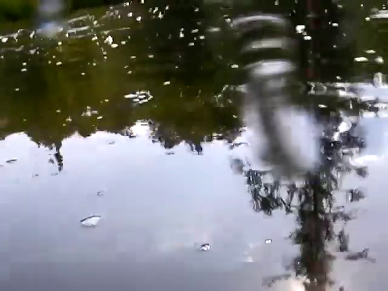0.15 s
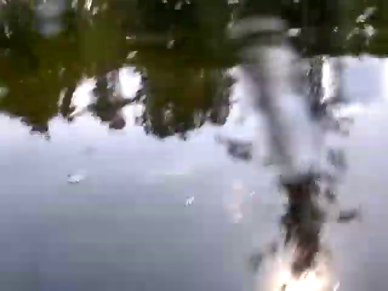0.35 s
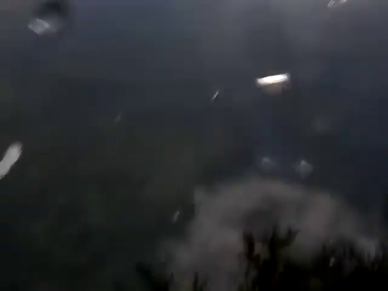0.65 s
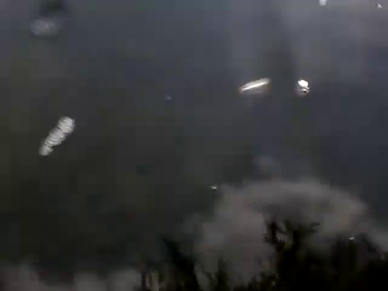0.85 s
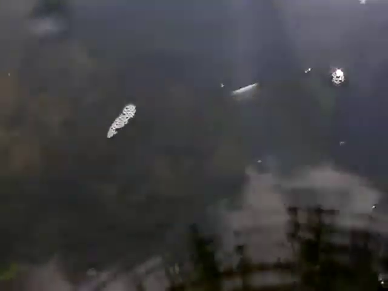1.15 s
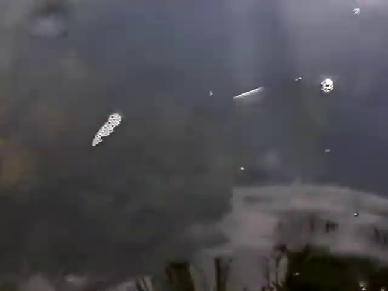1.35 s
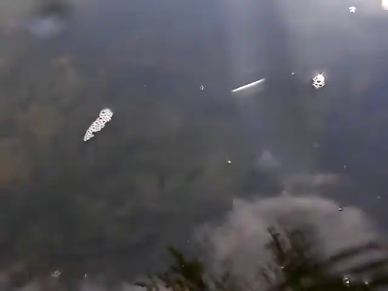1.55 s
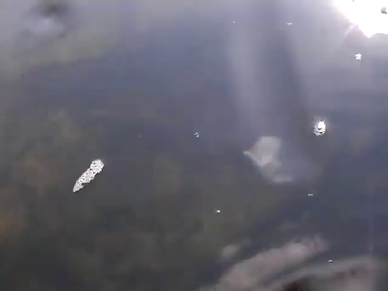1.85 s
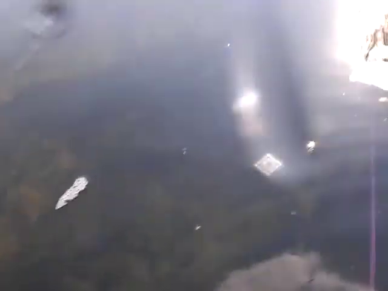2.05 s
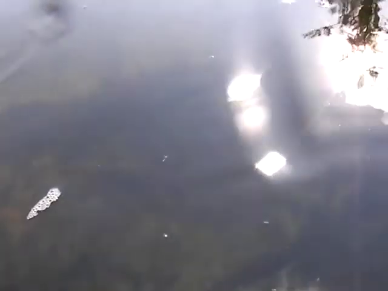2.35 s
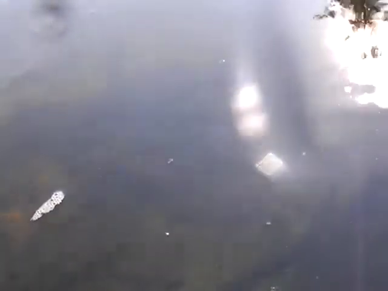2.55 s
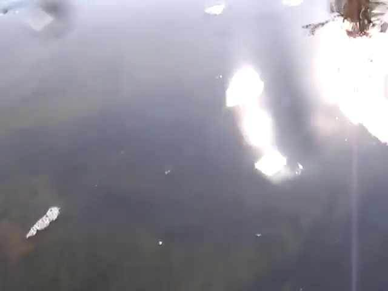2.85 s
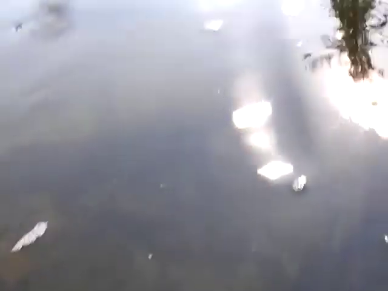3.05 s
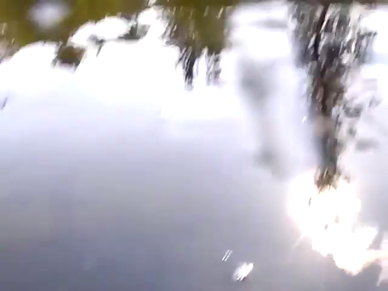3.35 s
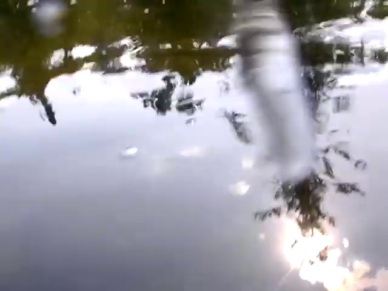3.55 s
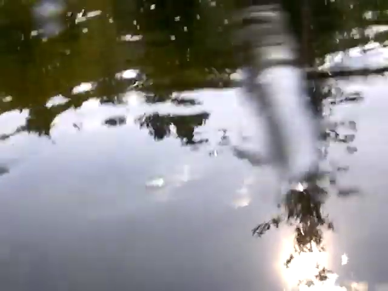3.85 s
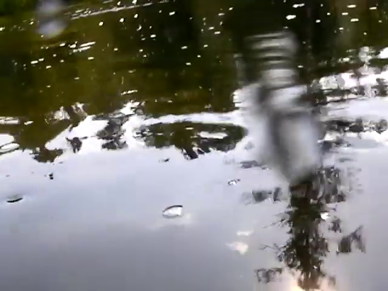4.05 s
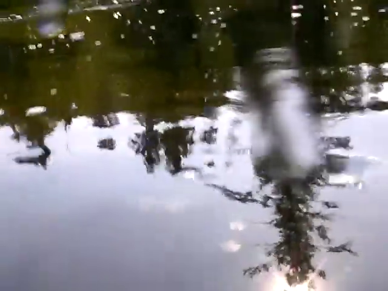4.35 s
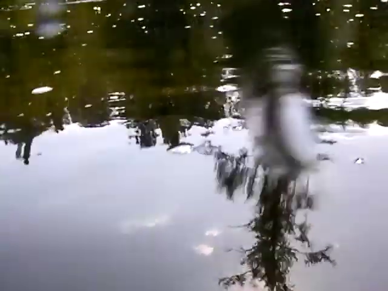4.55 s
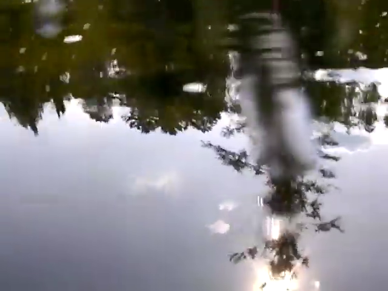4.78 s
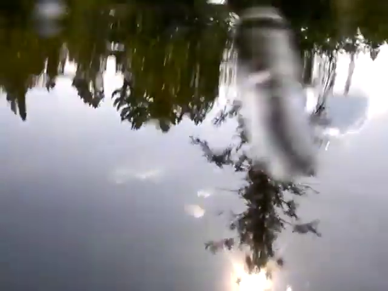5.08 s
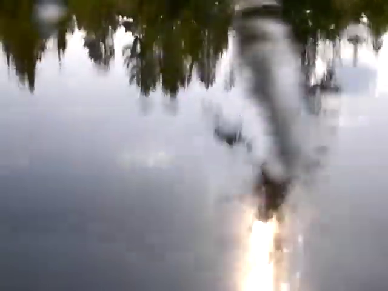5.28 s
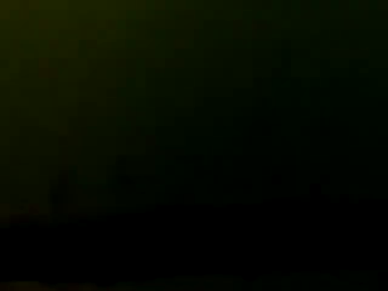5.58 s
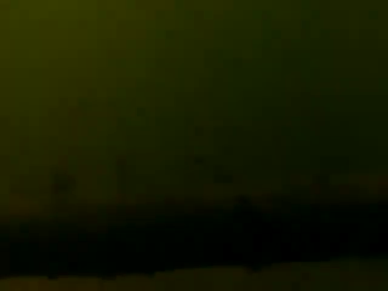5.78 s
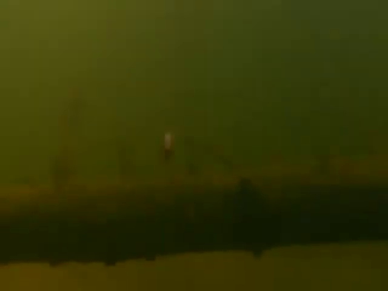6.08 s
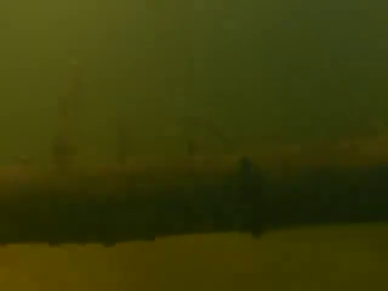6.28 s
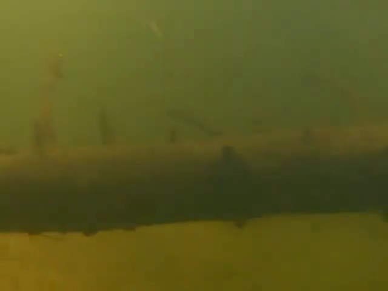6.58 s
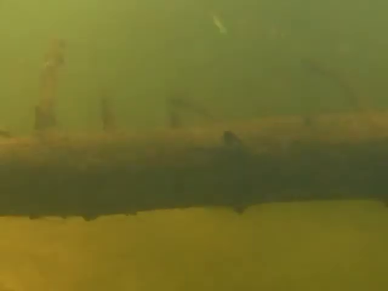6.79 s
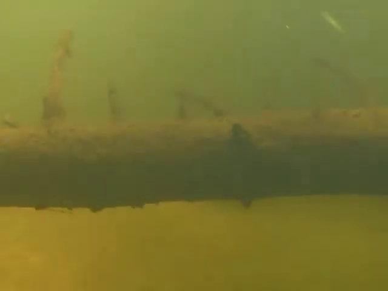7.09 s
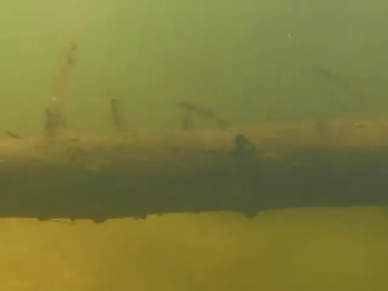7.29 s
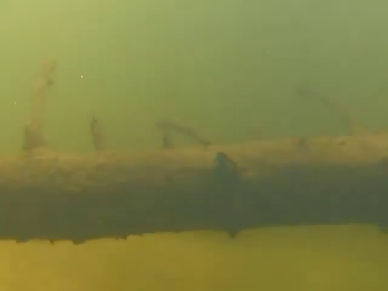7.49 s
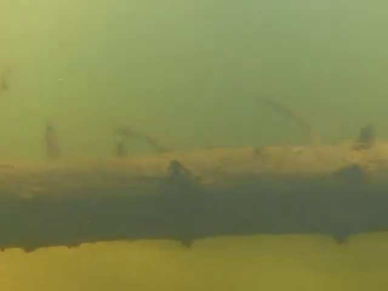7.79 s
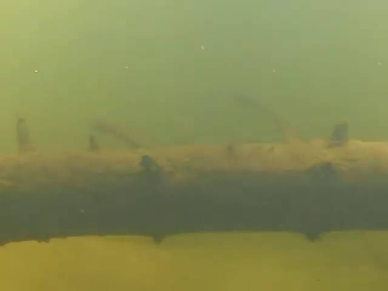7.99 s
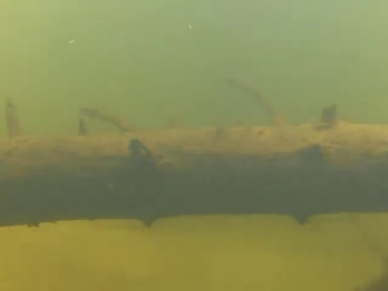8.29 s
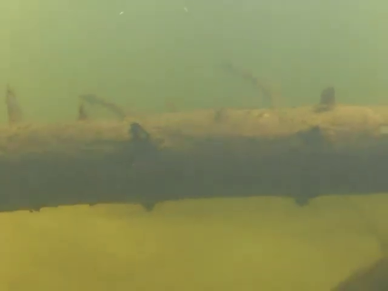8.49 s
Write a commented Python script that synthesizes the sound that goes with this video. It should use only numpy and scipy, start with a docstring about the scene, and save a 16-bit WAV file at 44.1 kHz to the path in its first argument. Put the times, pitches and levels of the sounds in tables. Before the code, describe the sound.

Quiet brook hiss with runs of close mechanical ticking, then a loud plunge, slaps and crackling foam, gulping bubbles and dull underwater knocks.

```python
"""A small mechanism inside a waterproof camera steps in runs, 15 or 10 times a second, close to both microphones.
The camera skims a stream and plunges in at 5.7 s; its two microphone ports ring with whatever strikes the case.
In air the steps tick in the wet right port while the left one hisses; under water each is a dull knock.
Water slaps the ports, and air escapes from the case in knocks, gulps and bubbles.
Around it lie the brook above water, a churning bed below that settles unevenly, and thin far-off bird whistles."""
import sys
import numpy as np
from scipy import signal
from scipy.fft import rfft, irfft, next_fast_len
from scipy.io import wavfile
from scipy.ndimage import uniform_filter1d, minimum_filter1d, map_coordinates

SR = 44100
rng = np.random.default_rng(int(sys.argv[2]) if len(sys.argv) > 2 else 0)


def wav_record(signal):
    """Record a signal, one row per channel, as 16-bit PCM in the file named by sys.argv[1]."""
    frames = np.transpose(np.atleast_2d(signal))
    bounded = np.clip(frames, -1, 1)
    # unit amplitude maps onto the largest positive 16-bit level
    quanta = np.round(bounded * 32767).astype(np.int16)
    wavfile.write(sys.argv[1], SR, quanta)


N = 380583

# All levels are set ahead of each layer's own trims and the camera's response; balances are left over right.
# runs of the mechanism: (first step [s], number of steps, interval [clock beats])
STEP_RUNS = [(.7451, 11, 2), (1.6125, 5, 3), (2.3813, 23, 2), (5.7875, 7, 2), (6.2895, 6, 3),
             (7.4225, 5, 2)]
# force of the steps in air: (time [s], level [dB])
FORCE_IN_AIR = [(.745, -21.5), (.82, -26), (1.3, -30.5), (1.42, -24.5), (1.7, -28), (2.0, -23),
                (2.52, -24.5), (2.65, -20.5), (2.8, -25.5), (3.2, -23), (3.85, -26)]
# force of the steps under water: (time [s], level [dB])
FORCE_IN_WATER = [(5.79, -5), (6.05, -7), (6.13, -3.5), (6.3, -6.5), (6.49, -11), (6.59, -6), (6.69, -16.5),
                  (6.79, -4.5), (7.42, -3), (7.65, -9.5)]
# resonances of the wet right port, rung by steps in air: (centre [Hz], width [Hz], level [dB])
WET_PORT = [(515, 21, -10.5), (715, 41.7, 7.5), (1274, 170, -12), (3000, 750, -11)]
# resonances of the left port, rung by steps in air: (centre [Hz], width [Hz], level [dB])
DRY_PORT = [(750, 28, -17), (1000, 65, -31)]
# resonances of the flooded left port: (centre [Hz], width [Hz], level [dB])
FLOODED_LEFT = [(177, 13, -35), (421.6, 12.6, -4.5), (530.6, 94, 3), (1060, 52, -15.5), (2050, 73, -25.5)]
# resonances of the flooded right port: (centre [Hz], width [Hz], level [dB])
FLOODED_RIGHT = [(446, 103, 20), (623.6, 119, 22.5), (776, 50, -17), (1030, 200, -57), (1930, 1000, 1)]
# water slapping into the ports: (time [s], level [dB])
SLAPS = [(5.708, 4.5), (5.72, -11), (5.816, -19), (5.8627, -2), (5.8812, -8), (5.8901, 2), (5.8967, -2.5),
         (6.0661, -5), (6.1094, -5), (6.1581, -11.5), (6.8143, -15), (6.9516, -19), (7.155, -18.5),
         (7.5378, -12.5), (8.1424, -23.5), (8.5517, -11.5)]
# big air pockets leaving the case:
# (time [s], knock level [dB], starting ring pitch [Hz], ring level [dB], ring 60 dB decay [s])
POCKETS = [(6.0028, -5.5, 400, -7, 0.016), (6.2286, -6, 1200, -15, .031), (6.5712, -5, 882, -6, 0.054),
           (6.6317, -5.5, 1044, -23, 0.093), (8.2783, -5, 1340, -14, .028)]
# single bubbles: (time [s], level [dB], starting pitch [Hz], 60 dB decay [s], balance [dB])
BUBBLES = [(0.511, -27.5, 139.5, 0.15, -18), (0.945, -19, 390, 0.025, -39), (0.95, -22.5, 171, 0.016, -37),
           (1.579, -29.5, 170, 0.0082, -31), (2.121, -37.5, 288, 0.029, -26), (2.744, -30, 300, 0.018, -28),
           (3.253, -6.5, 538, 0.047, -25), (3.252, -12, 142, 0.11, -22), (3.265, -26.5, 212, 0.21, -25),
           (3.809, -39.5, 142, 0.14, -24), (4.79, -24.5, 486, 0.077, -19), (5.708, -6, 57.4, 0.017, 14),
           (5.7104, 7, 403, 0.0094, 31), (5.897, -2.5, 720, 0.025, -17), (6.109, -16, 920, 0.036, -15)]
# drops tapping the wet port: (time [s], level [dB])
TAPS = [(0.38, -30.5), (0.476, -27.5), (0.957, -22.5), (1.577, -27), (2.605, -27), (5.226, -29.5),
        (5.264, -25.5), (5.348, -31), (5.498, -24), (5.52, -22.5)]
# resonances of the water film on the right port: (centre [Hz], width [Hz], level [dB])
FILM = [(168, 32, 0), (530, 160, -20), (750, 490, 7), (1426, 92, 7.5), (2760, 1000, -18)]
# tiny bubbles bursting at the left port: (time [s], level [dB])
SPITS = [(3.5196, -27), (3.9593, -26.5), (4.5844, -26.5), (4.6571, -27), (4.84, -26), (5.1041, -29.5),
         (5.2974, -21.5), (5.4306, -22)]
# spectrum of a spit: (frequency [Hz], relative level [dB])
SPIT_SPECTRUM = [(300, -9), (3500, -8.5), (6300, 15), (9500, 0.5), (12500, 3.5), (15500, -27)]
# air pockets snapping under water: (time [s], level [dB])
SNAPS = [(5.712, -13.5), (5.721, -18), (5.8925, -13.5), (6.004, -14.5), (6.0659, -4.5), (6.57, -20),
         (6.949, -31.5), (7.455, -30), (7.537, -28), (8.278, -16.5)]
# spectrum of a snap: (frequency [Hz], relative level [dB])
SNAP_SPECTRUM = [(200, -35), (900, 14.5), (2500, 0.5), (5000, -6), (9000, -2), (15000, -21)]
# foam spectrum: (frequency [Hz], relative level [dB])
FOAM_SPECTRUM = [(300, -13), (1600, 4.5), (4500, 4), (8500, 1), (15000, -7)]
# far-off bird whistles: (time [s], length [s], start pitch [Hz], end pitch [Hz], level [dB])
CHIRPS = [(1.052, .27, 4170, 4200, -57), (1.94, .12, 8550, 9400, -58), (3.1, 0.064, 6300, 7250, -45),
          (3.72, 0.22, 3830, 3720, -52)]
# churning under water: (time [s], level [dB])
CHURN = [(5.76, -57), (5.81, -31.5), (5.93, -29), (6.1, -36.5), (6.35, -47), (6.6, -38), (6.9, -45.5),
         (7.3, -46.5), (7.52, -47), (7.9, -46.5), (8.6, -43)]
# spectrum of the flow's rumble: (frequency [Hz], relative level [dB])
RUMBLE_SPECTRUM = [(20, 3), (110, 0.5), (175, 13.5), (240, -15.5), (400, -28), (1000, -56)]
# above water: (time [s], left hiss level [dB], right trickle level [dB])
AIR = [(0, -57, -60.5), (.75, -59.5, -60), (2.1, -62.5, -59.5), (3.1, -61.5, -68), (3.4, -54.5, -65),
       (3.8, -58, -65.5), (4.15, -51.5, -59), (4.5, -58.5, -62.5), (4.95, -55.5, -59.5), (5.42, -57, -51.5),
       (5.56, -54.5, -44), (5.7, -52, -51)]
# spectrum of the left port's hiss: (frequency [Hz], relative level [dB])
HISS_SPECTRUM = [(25, -20.5), (400, -5), (2500, -9), (4500, -8), (6500, 3.5), (9500, -7.5), (12400, -3),
                 (15000, -16)]
# spectrum of the brook's wash: (frequency [Hz], relative level [dB])
BROOK_SPECTRUM = [(25, -2), (130, 4), (800, 5), (2000, -3), (3500, -5), (15000, -24.5)]

PLUNGE_S = 5.71
SIZE = 8192  # samples in a short sound
T = np.arange(SIZE) / SR
LEAD_S = 0.00301  # from the start of a blow to its push
REBOUND_S, REBOUND_SCATTER_S = .0135, .0013  # delay of each step's rebound and its spread


def amp(db):
    """Decibels to gain."""
    return 10 ** (np.asarray(db) / 20)


def unit(x):
    """x at rms 1."""
    return x / np.sqrt(np.mean(x ** 2) + 1e-20)


def peaked(x):
    """x at peak 1."""
    return x / abs(x).max()


def curves(rows):
    """One value per sample for each column after the time."""
    s, *columns = np.transpose(rows)
    return [np.interp(np.arange(N) / SR, s, column) for column in columns]


def level_at(rows, s):
    """The value of a (time, value) curve at time s."""
    return np.interp(s, *np.transpose(rows))


def wobble(rate):
    """A smooth random curve, rate knots a second."""
    knots = rng.standard_normal(int(N * rate / SR) + 4)
    return map_coordinates(knots, [np.arange(N) * rate / SR])


def filtered(x, response):
    """x times a complex response of frequency."""
    n = x.shape[-1]
    m = next_fast_len(n + SIZE)
    return irfft(rfft(x, m) * response(np.fft.rfftfreq(m, 1 / SR)), m)[..., :n]


def coloured(x, points):
    """x shaped by (frequency, level) points on a log axis."""
    hz, db = np.transpose(points)
    return filtered(x, lambda f: amp(np.interp(np.log(f + 1), np.log(hz), db)))


def port(x, modes, muffle_hz, stretch=1):
    """x through a port's resonances and the low-pass of its membrane, all shifted by stretch."""
    def response(f):
        f = f / stretch
        ring = sum(amp(db) * 1j * f * w / (c * c - f * f + 1j * f * w) for c, w, db in modes)
        return ring / (1 + 1j * np.sqrt(2) * f / muffle_hz - (f / muffle_hz) ** 2)
    return filtered(x, response)


def panned(db):
    """Left and right gains of mean power 1."""
    return unit(amp([[db / 2], [-db / 2]]))


def add(track, s, sound):
    """Mix a sound in at time s."""
    i = round(s * SR)
    track[..., i:i + sound.shape[-1]] += sound[..., :track.shape[-1] - i]


def burst(t60):
    """A puff of noise of energy 1."""
    x = rng.standard_normal(SIZE) * amp(-60 * T / t60)
    return x / np.linalg.norm(x)


def blow(scatter, t60, lead_s=.003):
    """A sharp push at lead_s amid an irregular shudder that swells up to it and dies after it."""
    shape = np.minimum(T / lead_s, 1) ** 3 * amp(-60 * np.maximum(T - lead_s, 0) / t60)
    shudder = shape * rng.standard_normal(SIZE)
    push = signal.unit_impulse(SIZE, round(lead_s * SR))
    return push + scatter * shudder / np.linalg.norm(shudder)


def crack(points, t60):
    """A very short burst of the given colour, peak 1."""
    delayed = np.roll(burst(t60), round(0.000847 * SR))
    return peaked(coloured(delayed, points))


def grains(rate, spread_db):
    """Sparse random impulses, rate a second on average, at rms 1; spread_db skews their sizes."""
    sizes = amp(spread_db * np.minimum(rng.exponential(size=N), 4)) * rng.standard_normal(N)
    return unit(sizes * (rng.random(N) < rate / SR))


def mechanism(clock_s=.03337, scatter_db=0.37):
    """The mechanism steps on its clock, in air and under water alike, with slightly uneven force."""
    out = np.zeros((2, N))
    for start, count, beats in STEP_RUNS:
        for s in start + clock_s * beats * np.arange(count):
            if s < PLUNGE_S:
                step = amp(level_at(FORCE_IN_AIR, s)) * tick()
            else:
                step = amp(level_at(FORCE_IN_WATER, s)) * flooded_tick(s)
            add(out, s - LEAD_S, amp(scatter_db * rng.normal()) * step)
    return out


def tick(rebound_db=-8, edge_hz=2300, edge_scatter=0.3, left_lead_s=0.00068,
         pitch_scatter=0.022, rebound_pitch_scatter=0.09):
    """A step in air rings the ports with its own pitch and hardness; a lighter rebound follows on the right."""
    push = blow(scatter=0.75, t60=0.028, lead_s=LEAD_S)
    stretch = 1 + pitch_scatter * rng.normal()
    edge = edge_hz * np.exp(edge_scatter * rng.normal())
    push = filtered(push, lambda f: 1 / (1 + (f / edge) ** 6))
    left = port(np.roll(push, -round(left_lead_s * SR)), DRY_PORT, 9000, stretch)
    right = port(push, WET_PORT, 1550, stretch)
    out = -np.array([left, right]) / np.std(right[:round(.018 * SR)])
    rebound_modes = [(805, 180, 4), (1380, 86, 6.5), (2680, 1400, -2.5)]  # Hz, width Hz, dB
    click = port(burst(t60=0.012), rebound_modes, 1700, 1 + rebound_pitch_scatter * rng.normal())
    delay = LEAD_S + REBOUND_S + REBOUND_SCATTER_S * rng.normal()
    add(out[1], delay, amp(rebound_db + 2.8 * rng.normal()) * peaked(click))
    return out


def flooded_tick(s, rebound_db=-13, muffle_hz=1900, edge_hz=2700):
    """A step under water is a dull knock with a light rebound in both flooded ports."""
    out = knock(s)
    puff = filtered(burst(t60=0.011), lambda f: 1 / (1 + (f / edge_hz) ** 6))
    click = np.array([peaked(port(puff, modes, muffle_hz)) for modes in (FLOODED_LEFT, FLOODED_RIGHT)])
    delay = LEAD_S + REBOUND_S + REBOUND_SCATTER_S * rng.normal()
    add(out, delay, amp(rebound_db) * click)
    return out


def knock(s, left_lag_s=0.00019, slosh=0.43, slosh_s=0.007543, pitch_scatter=0.031,
          pitch_rise=0.21, flooded_pan_db=-2, trapped_pan_db=-11):
    """A jolt rings the flooded ports, then water sloshes back twice; trapped air sets pitch and balance."""
    trapped = trapped_air(s)
    stretch = (1 + pitch_rise * trapped) * (1 + pitch_scatter * rng.normal())
    delays = LEAD_S + slosh_s * np.cumsum(rng.uniform(0.599, 1.405, 2))
    # water softens the edge
    jolt = filtered(-blow(scatter=0.68, t60=0.038, lead_s=LEAD_S), lambda f: 1 / (1 + (f / 2800) ** 3))

    def slosh_response(f):
        echoes = sum(slosh ** (k + 1) * np.exp(-2j * np.pi * f * d) for k, d in enumerate(delays))
        return echoes / (1 + (f / 950) ** 4)

    returns = filtered(signal.unit_impulse(SIZE), slosh_response)
    push = filtered(jolt + returns, lambda f: f ** 4 / (f ** 4 + 260 ** 4))  # thins the lows
    left = np.roll(port(push, FLOODED_LEFT, 673, stretch ** 0.69), round(left_lag_s * SR))
    right = port(push, FLOODED_RIGHT, 845, stretch ** 1.14)
    return panned(flooded_pan_db + trapped_pan_db * trapped) * np.array([peaked(left), peaked(right)])


def trapped_air(s, drain_s=0.22):
    """The share of air still trapped in the ports at time s, draining exponentially from the plunge."""
    return np.exp(-max(s - PLUNGE_S, 0) / drain_s)


def slaps(count=8, over_churn_db=17, scatter_db=3):
    """Big slaps of water jolt the ports, with small stray ones whose level follows the churning."""
    out = np.zeros((2, N))
    stray_times = rng.uniform(PLUNGE_S, N / SR, count)
    strays = [(s, level_at(CHURN, s) + over_churn_db + scatter_db * rng.normal()) for s in stray_times]
    for s, db in list(SLAPS) + strays:
        add(out, s - LEAD_S, amp(db) * knock(s))
    return out


def pockets(gulp_hz=134.4, gulp_t60=0.031, gulp_db=-11.5, pan_db=-11.5):
    """An escaping air pocket knocks the ports, gulps low and leaves a ringing bubble."""
    out = np.zeros((2, N))
    for s, db, ring_hz, ring_db, t60 in POCKETS:
        add(out, s - LEAD_S, amp(db) * knock(s))
        gulp = amp(db + gulp_db) * bubble(gulp_hz, gulp_t60)
        ring = amp(ring_db) * bubble(ring_hz, t60)
        add(out, s, panned(pan_db) * (gulp + ring))
    return out


def bubble(hz, t60, glide=0.12, flutter=0.058, rise_cycles=0.38):
    """A bubble swells within a cycle and rings at its own pitch, which creeps up as it dies; peak 1."""
    pitch = hz * (1 + glide * np.minimum(T / t60, 1))
    slow_noise = filtered(rng.standard_normal(SIZE), lambda f: 1 / (1 + (f / 200) ** 2))
    waver = 1 + flutter * unit(slow_noise)
    envelope = amp(-60 * T / t60) * (1 - np.exp(-T * hz / rise_cycles)) ** 2
    volume = np.cos(2 * np.pi * np.cumsum(pitch) / SR) * envelope * waver
    return peaked(np.gradient(volume))


def bubbles():
    """Single bubbles ring, most of them much closer to one port."""
    out = np.zeros((2, N))
    for s, db, hz, t60, pan_db in BUBBLES:
        add(out, s, amp(db) * panned(pan_db) * bubble(hz, t60))
    return out


def gurgles(count=42, start_s=5.82, thinning_s=.75, pitch_hz=680, pitch_scatter=0.327,
            life_cycles=24, over_churn_db=11, scatter_db=3):
    """Small bubbles leave the case, many after the plunge and fewer later; their level follows the churning."""
    out = np.zeros((2, N))
    for s in np.minimum(start_s + rng.exponential(thinning_s, count), (N - SIZE) / SR):
        pitch, size, side = rng.standard_normal(3)
        hz = pitch_hz * np.exp(pitch_scatter * pitch)
        db = level_at(CHURN, s) + over_churn_db + scatter_db * size
        add(out, s, amp(db) * panned(-4 + 5 * side) * bubble(hz, life_cycles / hz))
    return out


def droplets(flooded_edge_hz=4500, open_edge_hz=60000, dulling_s=0.35):
    """Drops tap the right port's film, bubbles spit at the left; air snaps under water, duller with time."""
    out = np.zeros((2, N))
    for s, db in TAPS:
        tap = port(blow(scatter=1.0, t60=0.023, lead_s=LEAD_S), FILM, 2570)
        add(out, s - LEAD_S, amp(db) * panned(-20) * peaked(tap))
    for s, db in SPITS:
        add(out, s, amp(db + 0.5) * panned(41) * crack(SPIT_SPECTRUM, t60=0.013))
    for s, db in SNAPS:
        edge = flooded_edge_hz + open_edge_hz * np.exp((PLUNGE_S - s) / dulling_s)
        snap = filtered(crack(SNAP_SPECTRUM, t60=0.0076), lambda f: 1 / (1 + (f / edge) ** 2))
        add(out, s, amp(db) * panned(-18) * peaked(snap))
    return out


def froth(crest_s=5.91, crest_db=-45.5, rise_db_per_s=255, fall_db_per_s=81):
    """Foam crackles in random grains as water closes over the case, swelling fast and dying more slowly."""
    t = np.arange(N) / SR - crest_s
    foam_db = crest_db + np.minimum(rise_db_per_s * t, -fall_db_per_s * t)
    foam = np.array([grains(rate=600, spread_db=6), grains(rate=600, spread_db=6)])
    return amp(foam_db) * panned(-4) * unit(coloured(foam, FOAM_SPECTRUM))


def chirps(arch_share=0.036):
    """Faint far-off bird whistles, sines whose pitch arches in mid-note, reach only the open left port."""
    out = np.zeros((2, N))
    for s, length, start_hz, end_hz, db in CHIRPS:
        n = round(length * SR)
        arch = arch_share * np.sin(np.linspace(0, np.pi, n))
        pitch = np.linspace(start_hz, end_hz, n) * (1 + arch + 0.011 * wobble(261)[:n])
        add(out[0], s, amp(db) * np.hanning(n) * np.sin(2 * np.pi * np.cumsum(pitch) / SR))
    return out


def depths():
    """Under water: countless small jolts ring the flooded ports; the flow's rumble grows with them."""
    churn_db, = curves(CHURN)
    stir = grains(rate=290, spread_db=-0.5) + 0.73 * rng.standard_normal(N)
    left = unit(port(stir + .5 * rng.standard_normal(N), FLOODED_LEFT, 920, stretch=0.937))
    right = unit(port(stir + .5 * rng.standard_normal(N), FLOODED_RIGHT, 1570, stretch=1.123))
    churn = amp(churn_db - 1.5 + 3.76 * wobble(31)) * np.array([left, right])
    # one noise common to both ports plus one of each port's own
    flow_noise = rng.standard_normal(N) + 0.94 * rng.standard_normal((2, N))
    flow = unit(coloured(flow_noise, RUMBLE_SPECTRUM))
    return churn + amp(.75 * churn_db - 15 + 3 * wobble(10)) * flow


def surface():
    """Above water: the brook's wash, a fine hiss on the left and a trickle in the film on the right."""
    hiss_db, trickle_db = curves(AIR)
    hiss = unit(coloured(rng.standard_normal(N), HISS_SPECTRUM))
    hiss = amp(hiss_db + 6.5 + 0.3 * wobble(8.6)) * hiss
    patter = 0.51 * rng.standard_normal(N) + grains(rate=220, spread_db=6)
    trickle = unit(port(patter, FILM, 2560, stretch=1.022))
    trickle = amp(trickle_db + 5 + 2.5 * wobble(20)) * trickle
    wash = unit(coloured(rng.standard_normal(N), BROOK_SPECTRUM))
    brook = amp(-63.0 + wobble(4.93)) * panned(-11) * wash
    return np.array([hiss, trickle]) + brook


def scene():
    """The surface gives way to the depths at the plunge; the microphones add their own faint hiss."""
    under = np.clip((np.arange(N) / SR - PLUNGE_S) / 0.011, 0, 1)
    microphone_hiss = amp(-59.5) * rng.standard_normal((2, N))
    bed = (1 - under) * surface() + under * depths() + microphone_hiss
    case = mechanism() + slaps() + pockets()
    return case + bubbles() + gurgles() + droplets() + froth() + chirps() + bed


def limited(x, size=64):
    """The gain ducks smoothly wherever a channel would pass full scale."""
    needed = 1 / np.maximum(abs(x), 1)
    return x * uniform_filter1d(minimum_filter1d(needed, 2 * size), size)


def record(dry, top_hz=15350):
    """The camera has two notches in its response, limits at full scale and ends at its band limit."""
    def notch(f, hz, width_hz, depth):
        return 1 - depth * 1j * f * width_hz / (hz * hz - f * f + 1j * f * width_hz)
    shaped = filtered(dry, lambda f: notch(f, 246.3, 50, 1.0) * notch(f, 7920, 1840, 0.78))
    return filtered(limited(shaped), lambda f: 1 / (1 + (f / top_hz) ** 120))


dry = scene()
out = record(dry)
wav_record(out)
```